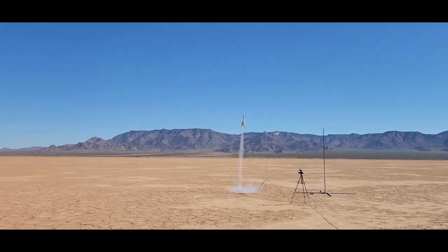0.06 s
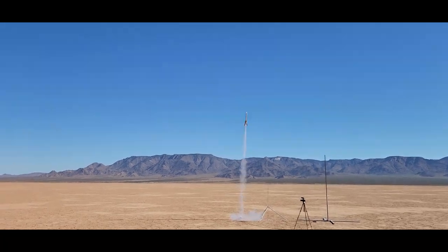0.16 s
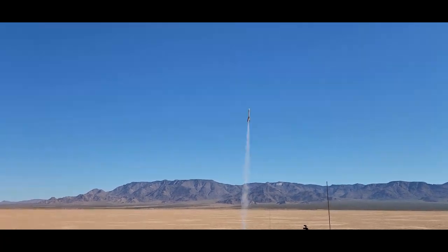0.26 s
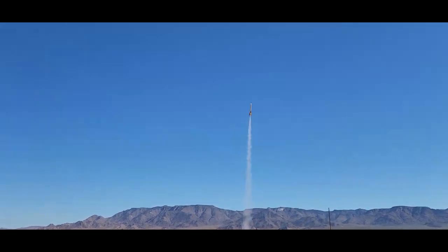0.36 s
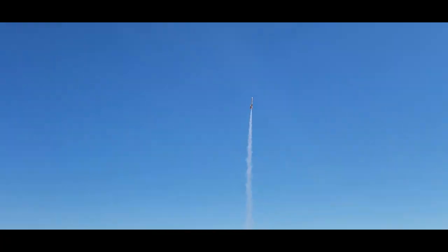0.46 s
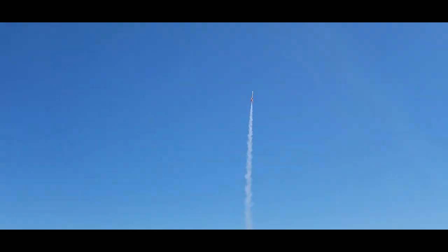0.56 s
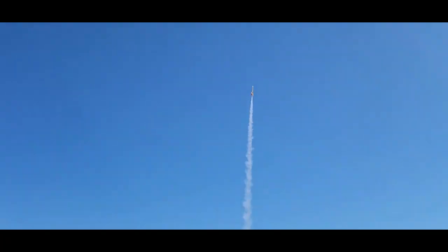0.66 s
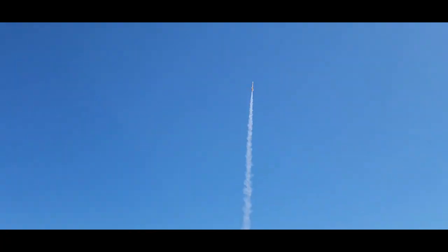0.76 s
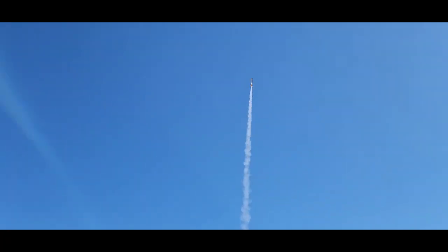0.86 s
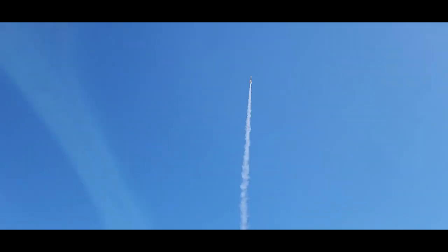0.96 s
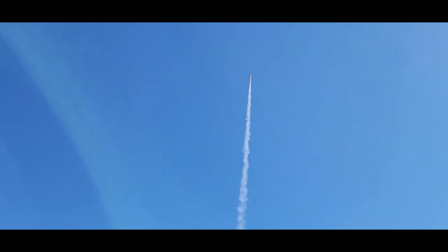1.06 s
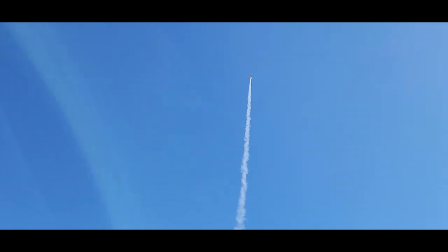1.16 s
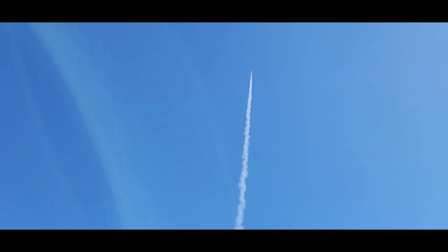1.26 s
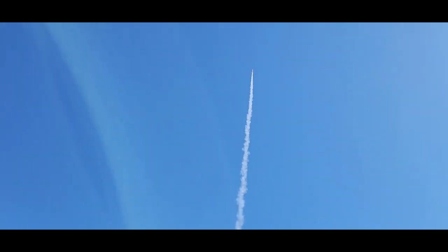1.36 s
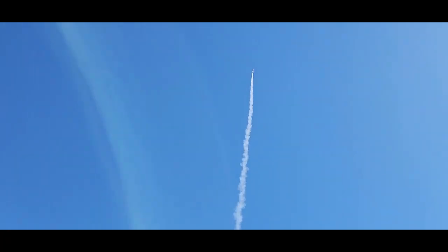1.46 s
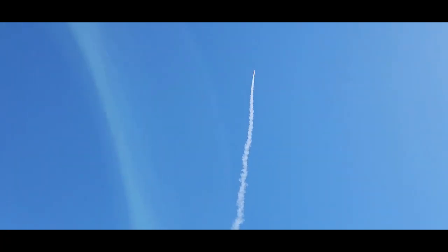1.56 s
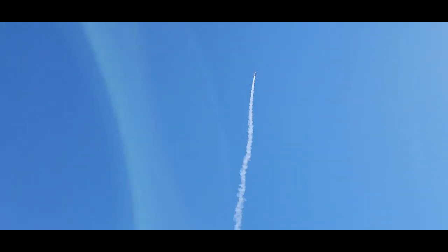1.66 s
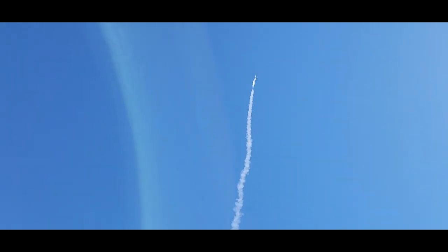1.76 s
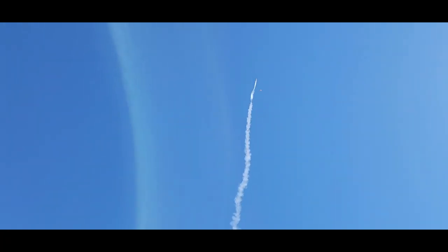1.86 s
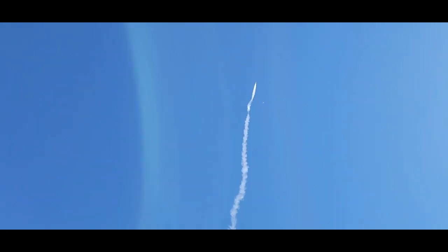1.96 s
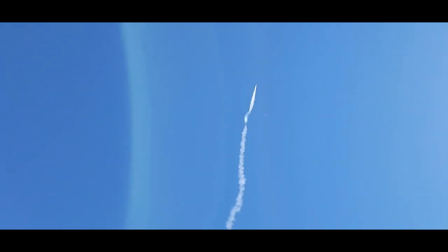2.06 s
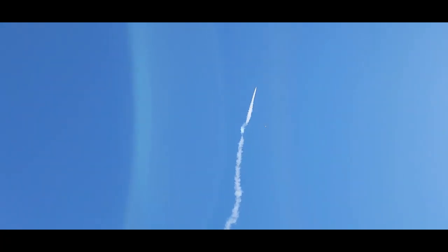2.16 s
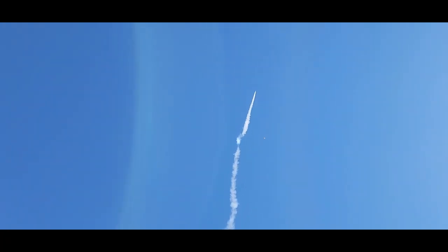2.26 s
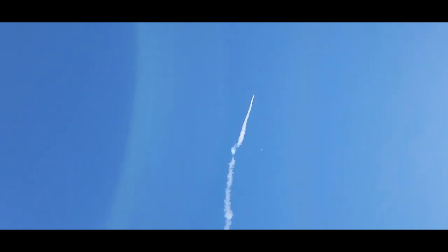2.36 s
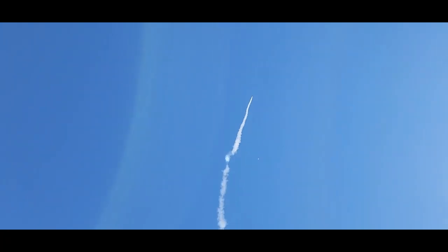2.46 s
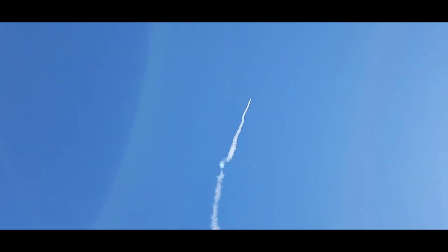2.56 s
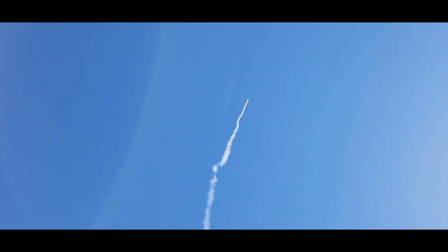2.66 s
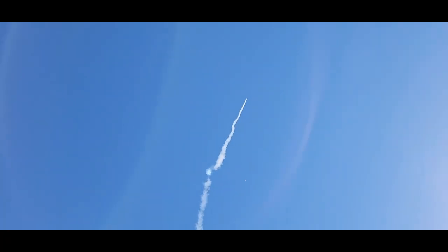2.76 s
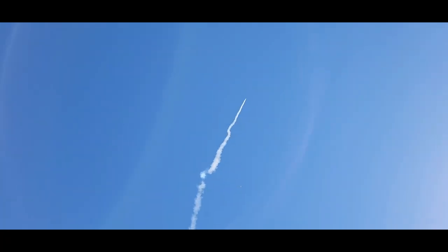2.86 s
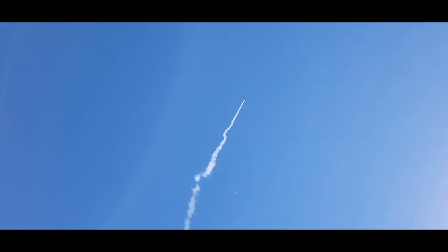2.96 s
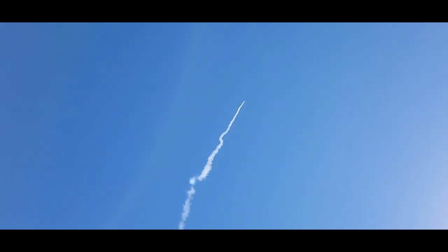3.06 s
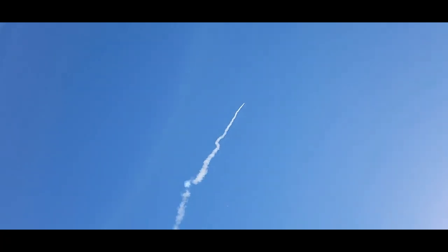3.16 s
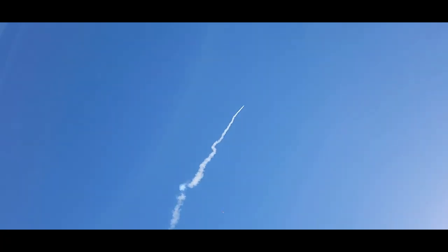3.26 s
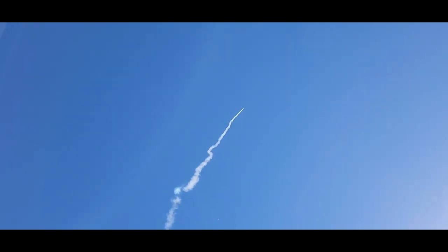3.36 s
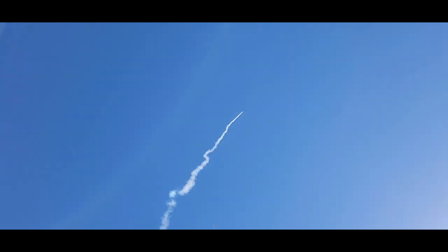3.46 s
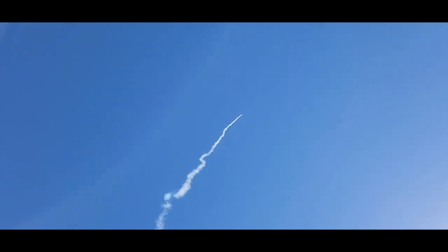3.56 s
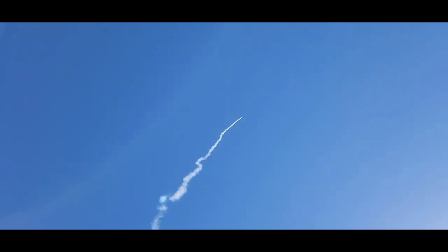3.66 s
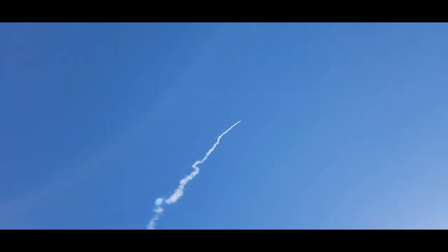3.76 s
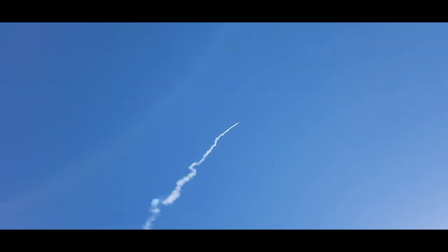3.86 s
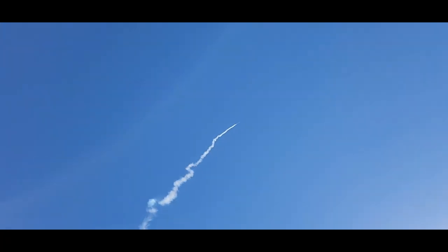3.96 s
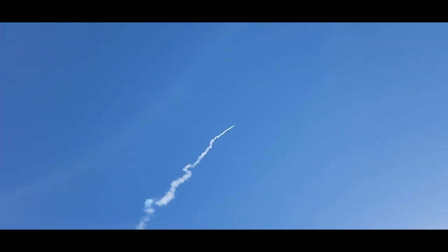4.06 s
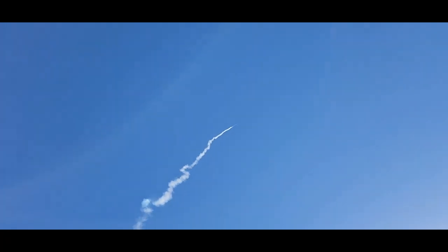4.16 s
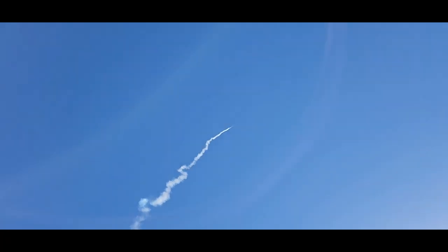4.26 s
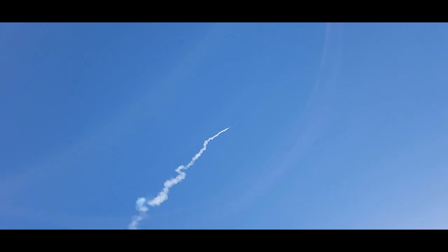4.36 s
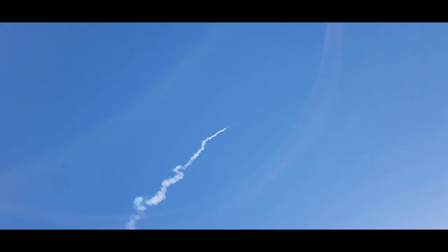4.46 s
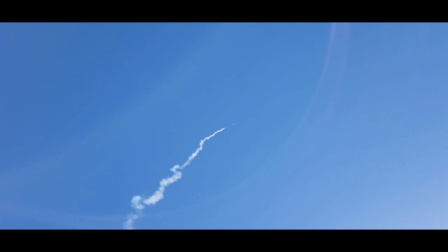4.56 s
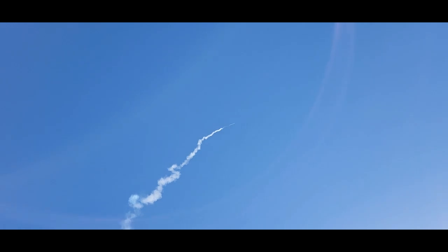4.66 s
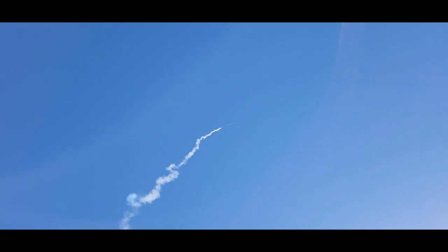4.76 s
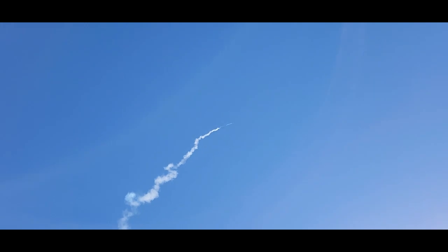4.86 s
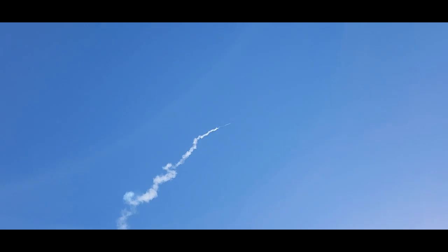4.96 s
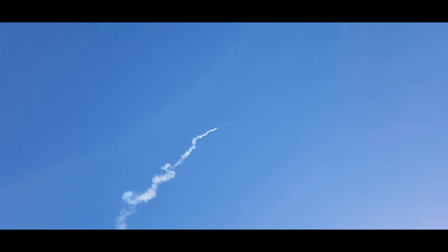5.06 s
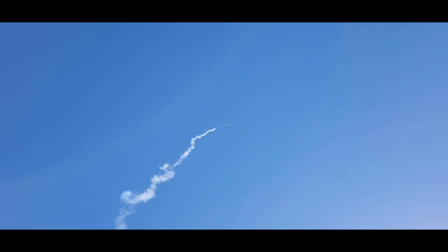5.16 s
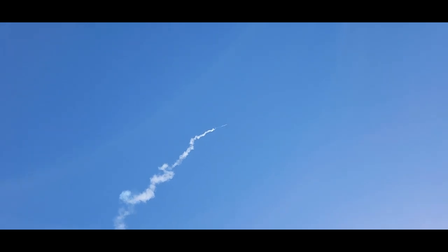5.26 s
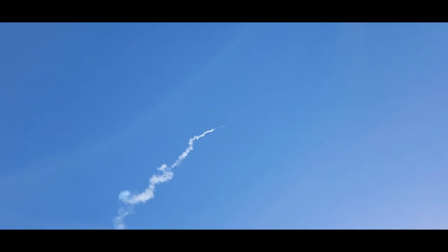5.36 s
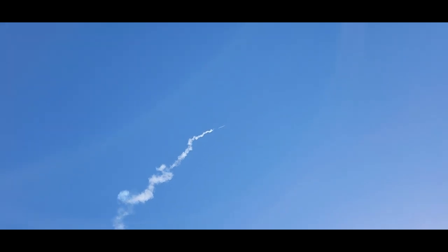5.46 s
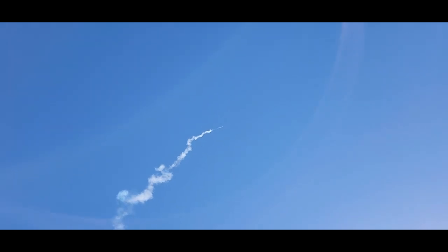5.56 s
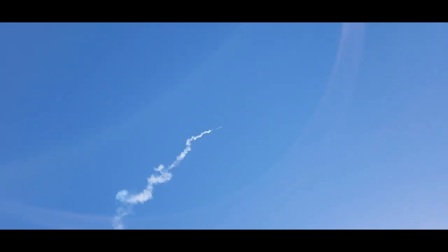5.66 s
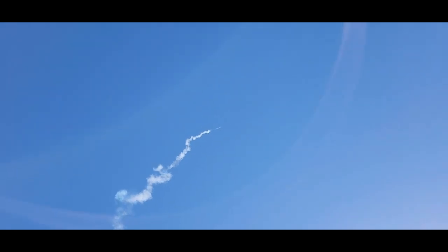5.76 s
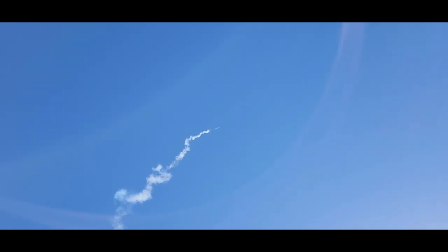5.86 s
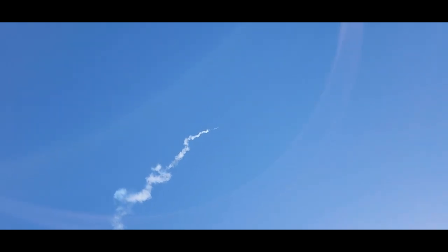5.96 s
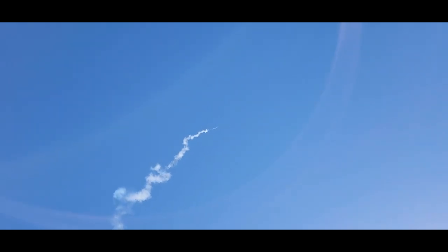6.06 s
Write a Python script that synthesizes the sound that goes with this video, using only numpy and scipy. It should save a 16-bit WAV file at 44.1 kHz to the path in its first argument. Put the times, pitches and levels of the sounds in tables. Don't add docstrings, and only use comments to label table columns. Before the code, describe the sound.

A handheld stereo microphone follows a two-stage model rocket over open desert. Low wind thumps accompany the first loud, bright, gritty jet hiss, its tone shifting as ground reflections spread. After a pop and a tiny gap, the second stage ignites with a hard spike, then recedes, crackling and losing treble. It ends in a cluster of sharp pops and a very brief echo, leaving faint air hiss, soft wind buffets and a few case clicks.

```python
import sys
import numpy as np
from scipy import signal
from scipy.io import wavfile
from scipy.ndimage import uniform_filter1d

SR = 44100
rng = np.random.default_rng(int(sys.argv[2]) if len(sys.argv) > 2 else 0)


def store_pcm(level_fs):
    pcm = np.round(np.clip(level_fs, -1, 1) * 32767).astype(np.int16)
    wavfile.write(sys.argv[1], SR, np.atleast_2d(pcm).T)


def attenuation_scalar(level_db):
    decades = np.asarray(level_db, float) / 20
    return 10 ** decades


N = 269563

# time_s, thrust_db
BOOST = [(0, -32.5), (.164, -26.5), (.368, -25.5), (.498, -23.5), (.726, -23), (1.066, -23), (1.768, -23.5),
         (1.788, -60), (1.83, -110)]
# time_s, thrust_db
SUSTAIN = [(1.8, -110), (1.93, -50.5), (1.986, -26.5), (2.024, -18.5), (2.12, -16), (2.184, -25),
           (2.4, -24), (3.544, -31), (4.138, -38)]
# peak_s, extra_db
SURGES = [(.56, 0), (.822, -0.5), (1.066, 2), (1.39, 1), (1.6, 1), (2.065, 0), (2.4, 2), (2.8, 2),
          (3.004, 4), (3.608, 1.5), (4.1, 2.5)]
# start_s, level_db, fall_db_per_s, body_db
AFTER = [
    (1.78, -47.5, 85.5, -6),
    (4.2, -62.5, 47, -12),
]
# freq_hz, density_db_per_hz
JET_SPECTRUM = [(60, -41.5), (200, -26), (500, -22), (1200, -15.5), (1800, -8), (2700, 0), (3600, -2),
                (4500, -6), (7400, -9.5), (8800, -12.5), (11500, -9.5), (13800, -18), (15200, -15.5),
                (16000, -21.5)]
# time_s, distance_m
RANGE = [(0, 34.6), (.5, 27), (1.2, 71.6), (2.3, 105), (3.2, 167), (4.15, 185), (4.4, 210)]
# start_s, peak_db, pitch_hz, puff_ms
POPS = [(.417, -25, 1200, 15), (0.577, -27, 395, 12), (.675, -30.5, 600, 15), (.745, -34.5, 400, 11),
        (0.857, -30, 600, 11), (.879, -29.5, 600, 6.7), (.964, -30.5, 550, 14), (1.125, -30.5, 600, 16),
        (1.239, -34, 400, 8.1), (1.763, -21, 1100, 14.6), (2.942, -38, 500, 11), (3.004, -35.5, 410, 8.1),
        (3.152, -43, 350, 8.4), (3.299, -48, 250, 16), (3.424, -36, 603, 6.4), (3.453, -36.5, 450, 12),
        (3.756, -30, 900, 10.5), (3.799, -41, 800, 5), (3.946, -26, 990, 14), (3.975, -34, 616, 7.5),
        (4.082, -25.5, 1400, 2.4), (4.102, -25.5, 1400, 1.6), (4.115, -30, 1300, 2.1),
        (4.164, -43, 500, 10)]
# time_s, near_echo_ms, far_echo_ms
FLIGHT = [(0, 1.1, 1.6), (.2, 1.8, 2.6), (.6, 3.8, 5.2), (.9, 5.4, 7.5), (1.1, 5.9, 8.6), (1.5, 6.3, 10.0),
          (2.0, 6.6, 10.9), (2.5, 6.85, 11.25), (2.8, 6.93, 11.35), (3.5, 6.8, 11.7), (4.2, 6.68, 11.7)]
# freq_hz, low_left_minus_right_db, low_mean_db, overhead_left_minus_right_db, overhead_mean_db
SHADE = [(168.5, 2, 2.5, 1, 1.5), (980, 0, 2.5, 0, -0.5), (1400, 6, 1, 1.5, 2.5), (1770, 6, -3, -3, 0),
         (2710, -8.5, -1.5, -13, -0.18), (3330, -3.5, 0, -9, 0.37), (3880, -1, -1, -6.5, -2.5),
         (4770, -5.5, 8, 1, 0.02), (5658, -1.5, 3, 7.5, -0.65), (8200, 3, 1, 10, 0.9),
         (9110, 5, -3, 3, -1.5), (12300, -3, 0, -1, 0), (13330, 2.5, 2.5, 0.5, 0.37),
         (14500, 13, 0.5, 16.5, -0.5)]
# freq_hz, right_phase_rad, likeness_0_1
LINK_LOW = [(170, 0, .94), (1030, -.1, .96), (1380, -.8, .75), (1720, 1.3, .65), (2580, .4, .75),
            (3100, -.7, .8), (3620, -1.4, .3), (4300, -2.5, .15), (4820, -5.3, .65), (5680, -6.2, .7),
            (8600, -6.4, .6), (12000, -8.1, .6), (13400, -8.8, .35), (15000, -8.4, .45)]
# freq_hz, right_phase_rad, likeness_0_1
LINK_HIGH = [(170, 0, .93), (1030, -.7, .96), (1370, -1.3, .75), (1560, -3.1, .1), (1800, -4.8, .45),
             (2580, -6.6, .95), (3100, -8.4, .9), (3620, -10.2, .55), (4900, -13.6, .75),
             (7600, -12.9, .65), (9650, -13.7, .65), (11200, -15.7, .92), (13400, -18.5, .65),
             (14500, -21.5, .35)]
# delay_ms, level_db
HOLDER = [
    [(1.3, -17), (2.35, -18), (4.5, -18)],
    [(1.55, -18), (2.2, -19), (4.2, -16)],
]
# start_s, peak_db, side_mode_gain_db
TICKS = [(4.3166, -53, 3), (4.3457, -43.5, 1), (4.4214, -55, -17)]
# freq_hz, level_db, t60_s
CASE_MODES = [(350, 3, 0.047), (1223, 1, 0.04), (2110, 0, 0.03), (2500, 6.5, .03), (7560, -23, .015)]
# time_s, level_db, left_minus_right_db
WIND = [(0, -43, 12), (.3, -59, 1), (.66, -69, -9), (1.1, -60, -4), (1.5, -65, -3.5), (3.2, -67.5, -9),
        (4.1, -61, -5), (4.4, -56, -8.5), (5.4, -57.5, -11.5), (5.95, -57.5, -8.5), (6.11, -65, -5)]
# peak_s, peak_db
BUFFETS = [(.12, -38), (.24, -36), (.5, -42.5), (.6, -49), (.8, -51.5), (.98, -59), (1.12, -47),
           (1.788, -50.5), (2.36, -61), (2.75, -56), (2.94, -57), (3.33, -55), (3.57, -51), (3.82, -50),
           (3.98, -53.5), (4.24, -58.5), (4.47, -53), (5.11, -48.5), (5.27, -52.5)]
# freq_hz, density_db_per_hz
WIND_SPECTRUM = [(8, -43), (15, -5.5), (37, -4), (57, -2.5), (73, -4.5), (107, -18.5), (140, -24),
                 (190, -33), (300, -48.5), (420, -84), (660, -120)]
# freq_hz, density_db_per_hz
AIR_SPECTRUM = [(150, -39.5), (250, -2.5), (450, -6.5), (660, -7.5), (1200, -8.5), (1500, -9.5), (2090, -2),
                (2500, -9.5), (3000, -5), (4400, -17.5), (5700, -15), (6800, -25.5), (7570, -18.5),
                (9300, -44), (11900, -20.5), (16000, -22)]
# freq_hz, left_minus_right_db
AIR_PAN = [(250, -2.5), (480, 6), (950, 2.5), (1900, -0.5), (3300, -5.5), (5700, 8.5), (7500, 11.5),
           (9000, 0.5), (12000, 13), (15000, 12)]
# freq_hz, db_re_loudest_band
MASK = [(6000, -50), (9300, -29), (11500, -31), (13500, -31), (14300, -24), (16000, -24)]
# time_s, middle_hz, half_width_hz
SKIPPED = [(1.95, 10900, 0), (2.02, 10900, 450), (2.2, 11500, 400), (2.6, 11200, 250), (2.7, 10300, 600),
           (3.2, 10100, 400), (3.4, 9950, 150), (4.15, 9950, 120), (4.2, 9950, 0)]

SURGE_RISE_S, SURGE_FADE_S = 0.019, 0.14
AFTER_THIN_DB_PER_S, AFTER_THIN_DB = 130, 10
BODY_DB = -20.5
WEAK_DB, WEAK_SHARE, HARD_DB, HARD_SHARE = -24.5, 1, -26, 1
HANDOVER_S, SPIKE_S = 1.86, 2.024
CUT_DB_PER_S, CUT_BODY_SHARE = 340.5, 0.45
NOZZLE_HZ, NOZZLE_OCTAVES, NOZZLE_DB = 3900, 0.28, 3.5
PLUME_LOW_HZ = 261
TREBLE_DB, AIR_DB_PER_M = 4, 0.1171
PUSH_HZ, PUSH_DB = 179, -15.5
HORIZON_MS, OVERHEAD_MS = 1.4, 6.1
VEER_S, VEER_US_PER_S, VEER_US = 2.35, 27, 40
CASE_MIDDLE_HZ = 1233
BUFFET_RISE_DB_PER_S, BUFFET_FADE_DB_PER_S = 249, 151
AIR_DB = -82
EDGE_HZ = 15700


def evened(x):
    return x / np.sqrt(np.mean(x ** 2) + 1e-20)


def read(points, hz):
    f, *columns = np.transpose(points)
    return np.array([np.interp(np.log(hz + 1), np.log(f + 1), c) for c in columns])


def follow(rows, t):
    s, *columns = np.transpose(rows)
    return np.array([np.interp(t, s, c) for c in columns])


def add(mix, s, sound):
    part = mix[round(s * SR):][:len(sound)]
    part += sound[:len(part)]


def drift(shape, width):
    noise = rng.standard_normal(shape)
    once = uniform_filter1d(noise, int(width) + 1)
    return evened(uniform_filter1d(once, int(width) + 1))


def shaped(x, gain, size):
    overlap = size * 3 // 4
    hz, t, z = signal.stft(x, SR, nperseg=size, noverlap=overlap)
    return signal.istft(z * gain(hz[:, None], t), SR, nperseg=size, noverlap=overlap)[1][..., :N]


def plume_body_db(thrust_db):
    weak_db = WEAK_SHARE * np.clip(WEAK_DB - thrust_db, 0, 11)
    hard_db = HARD_SHARE * np.maximum(thrust_db - HARD_DB, 0)
    return BODY_DB + weak_db + hard_db


def burn(t):
    surge_db = 0
    for s, db in SURGES:
        surge_db = surge_db + db * np.exp(-np.maximum((s - t) / SURGE_RISE_S, (t - s) / SURGE_FADE_S))
    cut_db = CUT_DB_PER_S * np.maximum(t - SUSTAIN[-1][0], 0)
    first_db, second_db = follow(BOOST, t)[0], follow(SUSTAIN, t)[0]
    levels_db = [first_db + surge_db, second_db + surge_db - cut_db]
    second_body_db = plume_body_db(second_db) + np.minimum(CUT_BODY_SHARE * cut_db, 8)
    bodies_db = [plume_body_db(first_db), np.where(t < SPIKE_S, BODY_DB - 0.5, second_body_db)]
    for s, db, fall_db_per_s, body_db in AFTER:
        levels_db.append(np.where(t < s, -200, db - fall_db_per_s * (t - s)))
        bodies_db.append(body_db - np.clip(AFTER_THIN_DB_PER_S * (t - s - .05), 0, AFTER_THIN_DB))
    power = attenuation_scalar(levels_db) ** 2
    total = power.sum(0)
    return 10 * np.log10(total), (power * bodies_db).sum(0) / total


def jet_gain(hz, t):
    thrust_db, body_db = burn(t)
    treble_db = TREBLE_DB - AIR_DB_PER_M * follow(RANGE, t)[0]
    above = np.clip((hz - 2800) / 4000, 0, 2.3) ** 0.93
    below = np.clip(np.log(2600 / (hz + 1)) / np.log(3.5), 0, 1.1)
    below = below / (1 + (PLUME_LOW_HZ / (hz + 1)) ** 4)
    rumble = 1.7 / (1 + (hz / 300) ** 4)
    nozzle = np.exp(-(np.log2((hz + 1) / NOZZLE_HZ) / NOZZLE_OCTAVES) ** 2)
    nozzle_db = NOZZLE_DB * nozzle * ((t > HANDOVER_S) - .4)
    shape_db = read(JET_SPECTRUM, hz)[0]
    core_db = shape_db[(hz > 1500) & (hz < 6000)]
    band_db = 10 * np.log10(np.sum(attenuation_scalar(core_db) ** 2) / len(hz))
    level_db = shape_db - band_db + thrust_db + nozzle_db + 2.5
    return attenuation_scalar(level_db + (above + rumble) * (treble_db + 4.5) + below * (body_db + 17.0))


def jet():
    sputter_db = .45 * drift(N, 2000) + 0.48 * drift(N, 350) + 0.78 * drift(N, 40)
    crackle_db = 3.36 * np.minimum(rng.exponential(1, (2, N)), 4)
    crackle = (rng.random((2, N)) < 900 / SR) * attenuation_scalar(crackle_db)
    raw = rng.standard_normal((2, N)) + 0.41 * crackle
    return shaped(evened(raw * attenuation_scalar(sputter_db)), jet_gain, size=256)


def cycle(t, hz):
    phase = t * hz * 2 * np.pi - 3
    return -phase * np.exp(-phase ** 2 / 2)


def pops():
    out, t = np.zeros(N), np.arange(2000) / SR
    for s, db, hz, ms in POPS:
        dull = signal.butter(2, [0.18 * hz, 2.1 * hz], "band", fs=SR)
        puff = evened(signal.lfilter(*dull, rng.standard_normal(len(t))))
        puff = puff * np.minimum(t * hz, 1) * np.exp(-(t * 1000 / ms) ** 4)
        shove = attenuation_scalar(PUSH_DB) * cycle(t, PUSH_HZ)
        add(out, s, attenuation_scalar(db) * (1.8 * cycle(t, hz) + 0.71 * shove + 0.51 * puff))
    return out


def shimmer(hz, t):
    patches = uniform_filter1d(drift((len(hz), len(t)), 22), 4, axis=0)
    return attenuation_scalar(1.5 * evened(patches))


def flight(t):
    near_ms, far_ms = follow(FLIGHT, t)
    up = np.clip((near_ms - HORIZON_MS) / (OVERHEAD_MS - HORIZON_MS), 0, 1)
    lag_us = np.clip((t - VEER_S) * VEER_US_PER_S, 0, VEER_US)
    return up ** 2 * (3 - 2 * up), near_ms, far_ms, lag_us


def ground(x, later_ms, near_db, far_db):
    n = np.arange(N)
    height, near_ms, far_ms, _ = flight(n / SR)
    soft = signal.lfilter(*signal.butter(1, 12000, fs=SR), x) * (.45 + .55 * height)
    near = np.interp(n - (near_ms + later_ms) * SR / 1000, n, soft)
    far = np.interp(n - far_ms * SR / 1000, n, soft)
    return x + attenuation_scalar(near_db) * near + attenuation_scalar(far_db) * far


def port_gain(hz, t):
    height, _, _, lag_us = flight(t)
    pan_low, mean_low, pan_high, mean_high = read(SHADE, hz)
    ratio = attenuation_scalar(-(pan_low + height * (pan_high - pan_low)))
    share = attenuation_scalar(mean_low + height * (mean_high - mean_low)) * np.sqrt(2 / (1 + ratio ** 2))
    phase_low, like_low = read(LINK_LOW, hz)
    phase_high, like_high = read(LINK_HIGH, hz)
    low = like_low * np.exp(1j * phase_low)
    high = like_high * np.exp(1j * phase_high)
    link = (low + height * (high - low)) * np.exp(-2j * np.pi * hz * lag_us / 10 ** 6)
    return np.array([share, share * ratio * link, share * ratio * np.sqrt(1 - abs(link) ** 2)])


def ports(left, right, scattered):
    a, b, c = shaped(np.array([left, right, scattered]), port_gain, size=512)
    return np.array([a, b + c])


def holder(x):
    taps = np.zeros((2, 256))
    taps[:, 0] = 1
    for port, rows in enumerate(HOLDER):
        for ms, db in rows:
            taps[port, round(ms * SR / 1000)] = attenuation_scalar(db)
    return signal.oaconvolve(x, taps, axes=1)[:, :N]


def ticks():
    out, t = np.zeros(N), np.arange(3000) / SR
    for s, db, side_gain_db in TICKS:
        ring = np.zeros(len(t))
        for hz, mode_db, t60_s in CASE_MODES:
            side_db = side_gain_db * (abs(hz / CASE_MIDDLE_HZ - 1) > .1)
            ring += attenuation_scalar(mode_db + side_db - 60 * t / t60_s) * np.sin(2 * np.pi * hz * t)
        clump = 0.37 * rng.standard_normal(200) * (rng.random(200) < .01) + signal.unit_impulse(200)
        add(out, s, attenuation_scalar(db - 17) * np.convolve(clump, ring))
    return out * attenuation_scalar(np.array([[1.5], [-1.5]]))


def wind():
    t = np.arange(N) / SR
    level_db, pan_db = follow(WIND, t)
    power = attenuation_scalar(level_db) ** 2
    for s, db in BUFFETS:
        near = slice(max(round((s - .3) * SR), 0), round((s + .4) * SR))
        rise_db = (s - t[near]) * BUFFET_RISE_DB_PER_S
        fade_db = (t[near] - s) * BUFFET_FADE_DB_PER_S
        power[near] += attenuation_scalar(db - np.maximum(rise_db, fade_db)) ** 2
    colour = lambda hz, t: attenuation_scalar(read(WIND_SPECTRUM, hz)[0])
    a, b = evened(shaped(rng.standard_normal((2, N)), colour, size=4096))
    lumps = np.sqrt(power) * attenuation_scalar(2.0 * drift(N, 900))
    return lumps * np.array([a * attenuation_scalar(pan_db / 2), (0.63 * a + .5 * b) * attenuation_scalar(-pan_db / 2)])


def air():
    side = np.array([.5, -.5])[:, None, None]
    colour = lambda hz, t: attenuation_scalar(read(AIR_SPECTRUM, hz)[0] + side * read(AIR_PAN, hz)[0])
    return attenuation_scalar(AIR_DB + 6.5) * evened(shaped(rng.standard_normal((2, N)), colour, size=512))


def thinned(x):
    hz, t, z = signal.stft(x, SR, nperseg=2048, noverlap=1024)
    power = abs(z) ** 2
    power_db = 10 * np.log10(abs(uniform_filter1d(power, 5, axis=1)) + 1e-20)
    band_db = 10 * np.log10(abs(uniform_filter1d(power, 32, axis=1)) + 1e-20)
    limit_db = band_db[:, 40:].max(1, keepdims=True) + read(MASK, hz[:, None])[0]
    whole = np.array([hz > 15300, hz > 14000])[..., None]
    limit_db = np.minimum(limit_db, band_db + np.where(whole, 9, -.5))
    middle_hz, half_hz = follow(SKIPPED, t)
    ragged_hz = half_hz * np.clip(1 + .6 * drift(len(t), 2), 0, 2)
    kept = (abs(hz[:, None] - middle_hz) >= ragged_hz) * (power_db > limit_db)
    return signal.istft(z * kept, SR, nperseg=2048, noverlap=1024)[1][:, :N]


def scene():
    shared, scattered = jet()
    shared = shaped(shared, shimmer, size=512) + pops()
    left = ground(shared, later_ms=0, near_db=-8, far_db=-13)
    right = ground(shared, later_ms=-.08, near_db=-9, far_db=-17)
    slanted = ground(scattered, later_ms=-2.5, near_db=-11, far_db=-20)
    rocket = holder(ports(left, right, slanted))
    return 0.84 * rocket + ticks() + wind() + air()


def roll_off(x):
    return signal.sosfilt(signal.butter(12, 16950, fs=SR, output="sos"), x)


def record(dry):
    edge = signal.firwin(1023, EDGE_HZ, window=("kaiser", 9), fs=SR)
    limited = signal.oaconvolve(dry, edge[None], "same")
    return roll_off(thinned(limited))


dry = scene()
out = record(dry)
store_pcm(out)
```